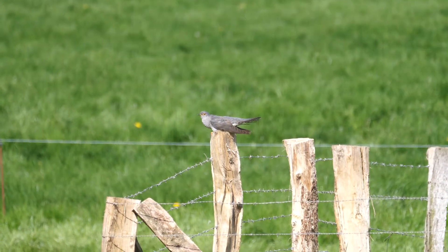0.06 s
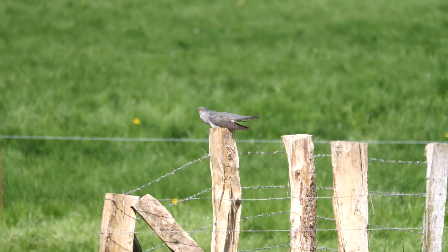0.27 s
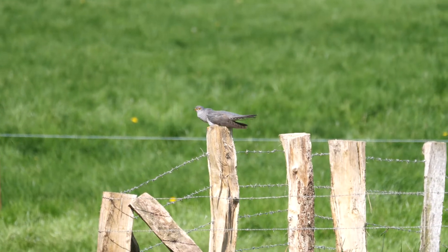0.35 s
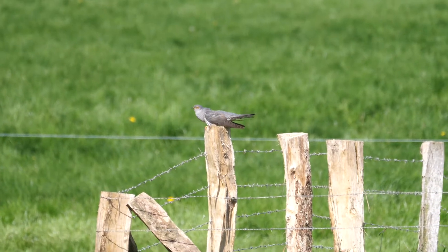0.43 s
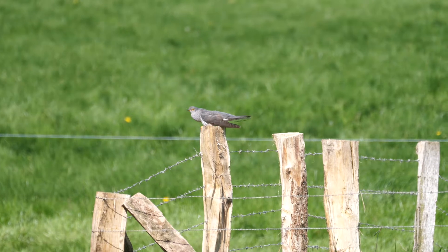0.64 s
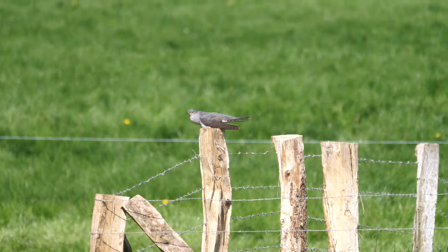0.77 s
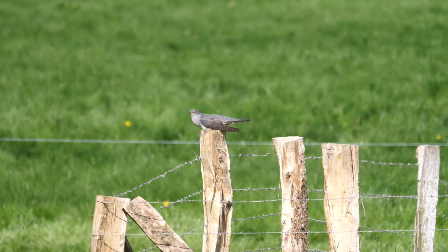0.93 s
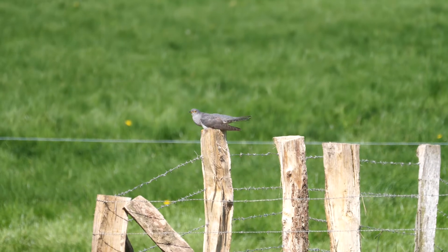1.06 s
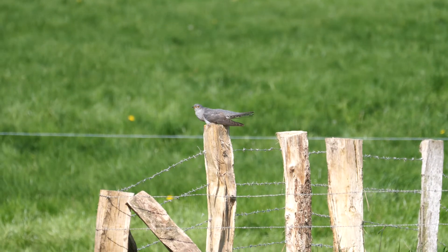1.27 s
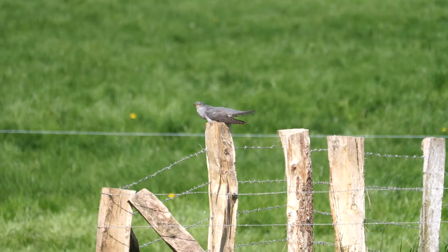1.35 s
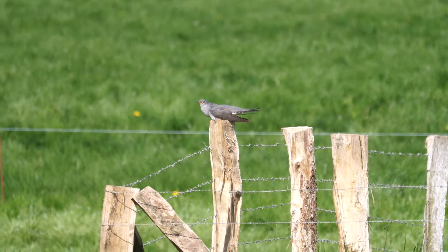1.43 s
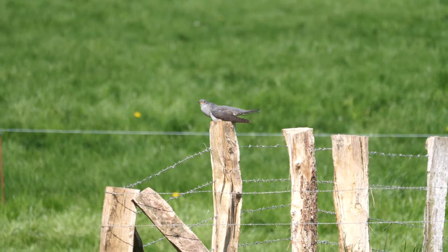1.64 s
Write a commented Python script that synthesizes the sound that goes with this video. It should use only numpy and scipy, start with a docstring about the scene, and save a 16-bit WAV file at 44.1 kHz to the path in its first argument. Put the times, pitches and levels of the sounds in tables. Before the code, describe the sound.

One two-note cuckoo call outdoors, with quick warbling birdsong and a steady breeze.

```python
"""A meadow edged with trees. A cuckoo on a fence post hoots its two falling, nearly pure notes, and
another answers faintly from far away. Off to the right a warbler hurries through whistles, slurs and
buzzes, made by sliding and shaking the pitch of one tone; two lower chips follow on the left.
The trees throw the near voices back, over a steady hush of wind and a low distant rumble."""
import sys
import numpy as np
from scipy import signal
from scipy.fft import rfft, irfft, next_fast_len
from scipy.io import wavfile
from scipy.ndimage import uniform_filter1d, map_coordinates

SR = 44100
rng = np.random.default_rng(int(sys.argv[2]) if len(sys.argv) > 2 else 0)


def int16_out(signal):
    """Quantize to a 16-bit WAV file."""
    q = np.round(np.clip(np.atleast_2d(signal).T, -1, 1) * 32767)
    wavfile.write(sys.argv[1], SR, q.astype(np.int16))


N = 74970

# the cuckoo's first note, an arch of pitch (time [s], pitch [Hz], level [dB])
HIGH_HOOT = [(.542, 570, -53), (.552, 619, -44.5), (.563, 691, -38.5), (.574, 702.6, -32), (.61, 686, -32),
             (.622, 662, -32.5), (.634, 611, -39), (.644, 610, -49)]
# its second note, lower and flat (time [s], pitch [Hz], level [dB])
LOW_HOOT = [(.838, 535, -62), (.848, 550, -47.5), (.865, 549, -41), (.916, 555, -34), (.96, 554, -34.5),
            (.992, 545.5, -35), (1.006, 550, -39), (1.016, 536, -56)]
# its slapback off the trees (delay [s], level [dB])
TREE_ECHOES = [(.0363, -15.8), (.0677, -11.6), (.1302, -15.8), (.1561, -26)]
# the warbler's quick slurs and buzzes (onset [s], length [s], start pitch [Hz], middle pitch [Hz],
# end pitch [Hz], level before the fade [dB], buzz depth [Hz], rasp [0-1])
WARBLER_NOTES = [ (.202, 0.011, 4750, 4930, 5100, -48, 1, 0.1),
                 (.213, 0.03, 4820, 4394, 4450, -40.5, 100, 0.1),
                 (.246, 0.049, 4080, 3780, 3826, -43.5, 235, 0.16),
                 (.369, 0.016, 4040, 4500, 4660, -37.5, -7, 0),
                 (.378, .02, 4740, 4890, 5400, -33.5, 8, 0.23),
                 (.370, 0.021, 3300, 3710, 3930, -47.5, -2, 0.1),
                 (.396, 0.033, 4870, 5040, 4700, -36.5, 205, 0.4),
                 (.412, 0.019, 6320, 5530, 5060, -41.5, 3, 0.45),
                 (.433, 0.024, 6100, 5890, 6100, -44, 153, 0.53),
                 (.486, 0.043, 5020, 4567, 4335, -34, 224, 0.33),
                 (.526, 0.025, 4060, 3660, 3530, -33.5, 1, 0.07),
                 (.613, 0.015, 5820, 4960, 4500, -39.5, 62, 0.6),
                 (.626, 0.016, 3940, 3790, 3190, -34, 4, 0.34),
                 (.616, 0.039, 6850, 6290, 6170, -54.5, 104, 0.5),
                 (.649, 0.013, 3570, 4125, 4900, -38, -1, 0.5), (.665, 0.017, 3590, 4250, 4880, -37, 4, 1),
                 (.681, 0.021, 4095, 4503, 4090, -36, 450, 0.63),
                 (.756, 0.01405, 3896, 2995, 3040, -35, -2.5, 0.15),
                 (.775, 0.0064, 3830, 3360, 2920, -35.5, -5, 0.2),
                 (.844, 0.016, 3200, 3874, 3750, -33, 4, 0.2),
                 (.893, 0.014, 4880, 4510, 4350, -38.5, 300, 0.2),
                 (.901, 0.039, 4425, 4325, 4270, -30, 316, 0.14),
                 (1.001, 0.013, 2950, 2860, 2850, -43.5, -4, 0.1),
                 (1.011, 0.011, 3290, 3330, 3450, -37, 3, 0),
                 (1.022, 0.010, 4030, 3670, 3400, -35.5, -2, 0.25),
                 (1.035, 0.010, 4160, 3700, 3400, -33, -7, 0.1),
                 (1.047, 0.013, 3993, 3503, 3280, -34.5, -5, .25),
                 (1.064, 0.015, 3040, 3200, 4230, -42.5, 205, 0.6),
                 (1.133, 0.019, 2367, 2401, 2380, -45, 100, 0.58),
                 (1.210, 0.023, 5070, 4116, 5250, -39, -1, 0.5),
                 (1.226, 0.044, 5260, 5370, 5200, -43, 62, 0.43),
                 (1.272, 0.0059, 5050, 4620, 4120, -36, 10, 0.05),
                 (1.278, 0.029, 5520, 5550, 5420, -44, 98, 0.5),
                 (1.279, 0.025, 3610, 3554, 3670, -48.5, 24, 0.5),
                 (1.300, 0.008, 5240, 4540, 3870, -40, 0, 0.6),
                 (1.356, 0.051, 3677, 3300, 3230, -44, 69, 0.48),
                 (1.367, 0.019, 3070, 2456, 2400, -48.5, 1, 0.4),
                 (1.392, 0.013, 2760, 2872, 2800, -38.5, -6, .2),
                 (1.413, 0.013, 2750, 3215, 2800, -41, 0, 0)]
# its clean held whistles (onset [s], length [s], start pitch [Hz], middle pitch [Hz], end pitch [Hz],
# level before the fade [dB])
WARBLER_WHISTLES = [(.292, 0.077, 3922, 3952, 3914, -31), (.777, .04, 2923, 2808, 2793, -34.5),
                    (0.802, .05, 3588, 3520, 3830, -33)]
# lower falling chips, with the columns of WARBLER_NOTES
FALLING_CHIPS = [(1.514, 0.0206, 2174, 1814, 1120, -49.5, 196, 0.3),
                 (1.682, 0.026, 2380, 1905, 1300, -46, 99, 0.2)]
# the far cuckoo's notes (onset [s], length [s], pitch [Hz], level [dB])
FAR_HOOTS = [(-.02, 0.17, 548, -61.5), (0.847, 0.22, 681, -55.5), (1.25, 0.16, 551, -61)]
# tone colour of wind in grass and trees (frequency [Hz], relative level [dB])
WIND_SPECTRUM = [(25, -40), (60, -17), (120, -3), (300, -1), (600, -1.5), (1000, -2.5), (2000, -6.5),
                 (4000, -6.5), (5500, -8.5), (7000, -15.5), (10500, -15.5), (13000, -20), (15200, -26)]
# tone colour of the distant rumble (frequency [Hz], relative level [dB])
RUMBLE_SPECTRUM = [(20, -36), (45, -25), (60, -26), (75, -8), (100, -8.5), (145, 0), (210, -8.5),
                   (400, -13.5), (1500, -51)]
# how alike left and right are in the background bed (frequency [Hz], coherence [0-1])
BED_COHERENCE = [(30, .75), (70, 0.97), (250, 0.97), (1000, 0.82), (3000, 0.72), (8000, 0.81), (13000, .25)]

WARBLER_PAN_DB, CUCKOO_PAN_DB, CHIPS_PAN_DB = -5.5, 1.2, 9.5  # left minus right
BUZZ_HZ, BUZZ_WANDER, BUZZ_FLUTTER = 192.2, 0.16, 0.14  # buzz rate, its drift, its tremolo depth
JITTER_HZ, RASP_WIDTH_HZ = 18.2, 700  # a chirp's pitch jitter; noise spread either side of its pitch
ATTACK_S, SWELL_SHARE = 0.002, 0.1  # a chirp's attack lasts this time plus this share of its length
FADE_DB_PER_S, RELEASE_S = 86, 0.0033  # it weakens as it is held, then shuts off


def hoot(contour, octave_db=-32):
    """One cuckoo note: a slightly unsteady sine with a trace of its octave."""
    times, hz, db = np.transpose(contour)
    t = np.arange(N) / SR
    phase = phase_of(np.interp(t, times, hz) * (1 + 0.0018 * wobble(68.8)))
    gate = (t > times[0]) * (t < times[-1])
    envelope = uniform_filter1d(amp(np.interp(t, times, db)) * gate, size=200)
    return np.sqrt(2) * envelope * (np.sin(phase) + amp(octave_db) * np.sin(2 * phase))


def cuckoo():
    """The lead voice: two hoots, their slapback off the trees and a faint tail."""
    call = hoot(HIGH_HOOT) + hoot(LOW_HOOT)
    delay_taps = lambda hz: sum(amp(db) * np.exp(-2j * np.pi * hz * delay) for delay, db in TREE_ECHOES)
    tail = amp(-16.5) * tree_scatter(call, t60_s=0.57, build_s=0.04, side_db=-7)
    return panned(call + filtered(call, delay_taps) + tail, CUCKOO_PAN_DB)


def chirp(onset, length, start_hz, middle_hz, end_hz, db, buzz_depth_hz=0, rasp=0):
    """A whistle sliding through three pitches; fast vibrato makes it buzz, uneven airflow hoarse."""
    t = np.arange(N) / SR - onset
    arc = np.polyfit([0, .5, 1], [start_hz, middle_hz, end_hz], 2)
    glide = np.polyval(arc, np.clip(t / length, 0, 1))
    vibrato = np.sin(phase_of(BUZZ_HZ * (1 + BUZZ_WANDER * wobble(120)) * (t > 0)))
    phase = phase_of((glide + buzz_depth_hz * vibrato + JITTER_HZ * wobble(300)) * (t > 0))
    grit = unit(signal.lfilter(*signal.butter(4, RASP_WIDTH_HZ, fs=SR), rng.standard_normal((2, N))))
    breath = grit[0] * np.sin(phase) + grit[1] * np.cos(phase)  # a noise band that tracks the pitch
    voice = np.sqrt(2 - 2 * rasp ** 2) * np.sin(phase) + rasp * breath
    ramps = np.minimum(t / (ATTACK_S + SWELL_SHARE * length), (length - t) / RELEASE_S)
    gate = np.sin(np.pi / 2 * np.clip(ramps, 0, 1))
    tremolo = 1 - BUZZ_FLUTTER * vibrato * (buzz_depth_hz > 0)
    return amp(db - FADE_DB_PER_S * np.clip(t, 0, length)) * gate * tremolo * voice


def phrase(notes, pan_db, wet_db=-1):
    """A run of chirps, panned together with its tail from the trees."""
    song = sum(chirp(*note) for note in notes)
    tail = tree_scatter(song, t60_s=0.74, build_s=0.0032, side_db=-13)
    return panned(song + amp(wet_db) * tail, pan_db)


def warbler(waver_db=1):
    """Slurs and buzzes washed in scatter, with drier whistles that waver in level."""
    slurs = phrase(WARBLER_NOTES, WARBLER_PAN_DB)
    whistles = phrase(WARBLER_WHISTLES, WARBLER_PAN_DB, wet_db=-6.5)
    return slurs + whistles * amp(waver_db * wobble(50))


def far_cuckoo():
    """Distance leaves only soft swells of tone."""
    t = np.arange(N) / SR
    call = np.zeros(N)
    for onset, length, hz, db in FAR_HOOTS:
        swell = np.sin(np.pi * np.clip((t - onset) / length, 0, 1))
        tone = np.sqrt(2) * np.sin(phase_of(hz * (1 + 0.0064 * wobble(41))))
        call += amp(db) * swell * tone
    return call


def tree_scatter(x, t60_s, build_s, side_db):
    """Stereo reverb from trunks and leaves: it builds up, then dies away."""
    t = np.arange(SR) / SR
    envelope = amp(-60 * t / t60_s) * (1 - np.exp(-t / build_s))
    mid, side = rng.standard_normal((2, SR)) * envelope
    tail = np.array([mid + amp(side_db) * side, mid - amp(side_db) * side])
    return signal.fftconvolve(x[None], tail / np.linalg.norm(tail[0]), axes=1)[:, :N]


def wind(level_db=-52):
    """The steady hush of air through grass and trees."""
    return amp(level_db + 0.058 * wobble(5.3)) * noise_bed(WIND_SPECTRUM)


def rumble(level_db=-62, rise_db_per_s=2.5, waver_db=1):
    """Distant low end that wavers and creeps up in level."""
    rise_db = rise_db_per_s * (np.arange(N) - N / 2) / SR
    return amp(level_db + rise_db + waver_db * wobble(7.8)) * noise_bed(RUMBLE_SPECTRUM)


def noise_bed(spectrum):
    """Shaped stereo noise of rms 1, nearly mono in the bass and wider in the treble."""
    def mid_side_eq(hz):
        width = np.arccos(np.clip(along(BED_COHERENCE, hz), -1, 1)) / 2
        return amp(along(spectrum, hz)) * [np.cos(width), np.sin(width)]
    mid, side = filtered(rng.standard_normal((2, N)), mid_side_eq)
    return unit(np.array([mid + side, mid - side]))


def amp(db):
    """Decibels to gain."""
    return 10 ** (np.asarray(db) / 20)


def unit(x):
    """Scale to rms 1."""
    return x / np.sqrt(np.mean(x ** 2) + 1e-20)


def along(points, hz):
    """Read a curve of (frequency [Hz], value) points on a log axis."""
    freqs, values = np.transpose(points)
    return np.interp(np.log(hz + 1), np.log(freqs + 1), values)


def wobble(rate):
    """Smooth random modulation, rate knots a second."""
    knots = rng.standard_normal(int(N * rate / SR) + 4)
    return map_coordinates(knots, [np.arange(N) * rate / SR])


def filtered(x, response):
    """Run a sound through a frequency response."""
    size = next_fast_len(N + SR // 2)
    return irfft(rfft(x, size) * response(np.fft.rfftfreq(size, 1 / SR)), size)[..., :N]


def phase_of(hz):
    """Running phase of a pitch curve."""
    return 2 * np.pi * np.cumsum(hz) / SR


def panned(x, pan_db):
    """Place a sound in the stereo field; positive is left."""
    return x * amp(np.array([[pan_db], [-pan_db]]) / 2)


def scene():
    """The birds over a bed of wind and rumble."""
    birds = cuckoo() + far_cuckoo() + warbler() + phrase(FALLING_CHIPS, CHIPS_PAN_DB)
    return birds + wind() + rumble()


def record(dry, top_hz=15300):
    """A brick-wall high cut on the mix."""
    return filtered(dry, lambda hz: hz < top_hz)


dry = scene()
out = record(dry)
int16_out(out)
```